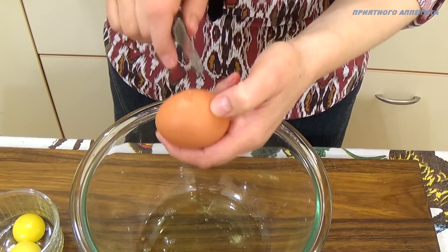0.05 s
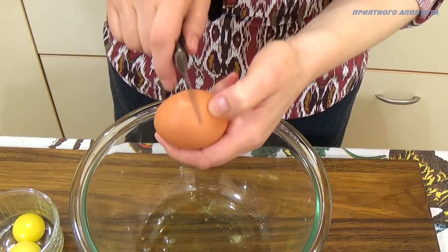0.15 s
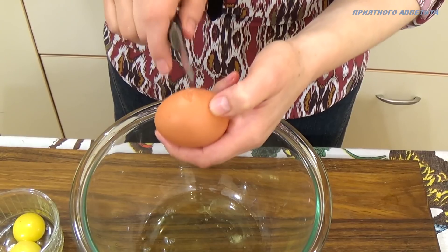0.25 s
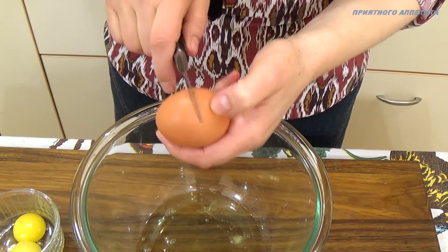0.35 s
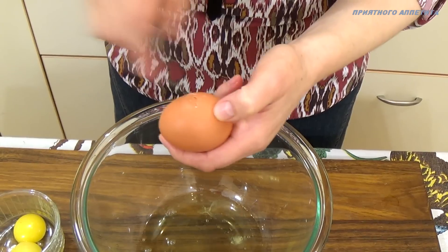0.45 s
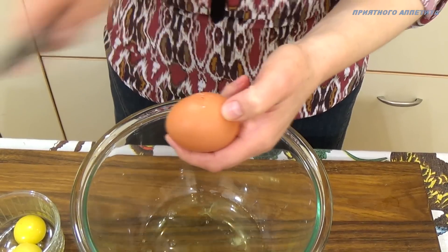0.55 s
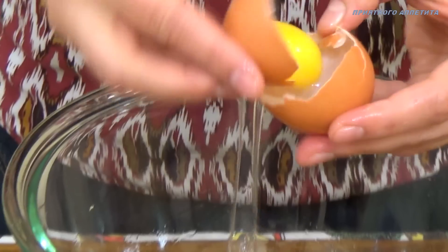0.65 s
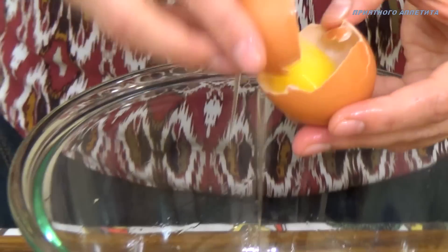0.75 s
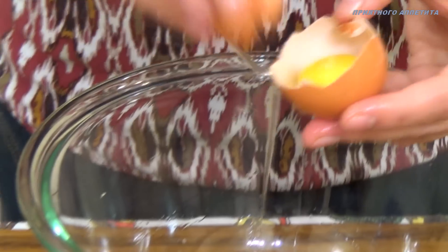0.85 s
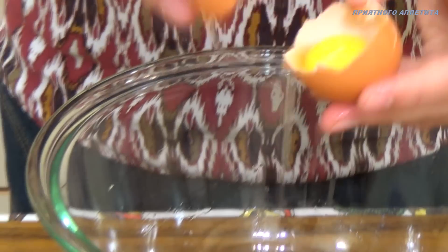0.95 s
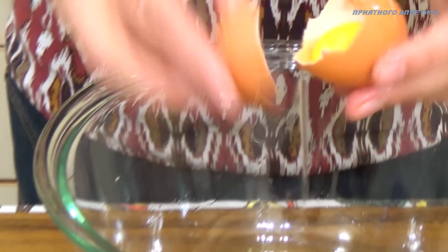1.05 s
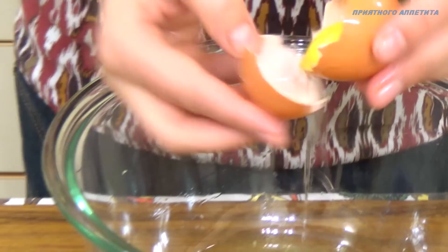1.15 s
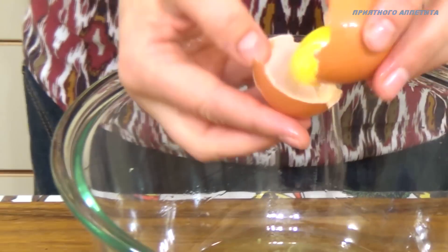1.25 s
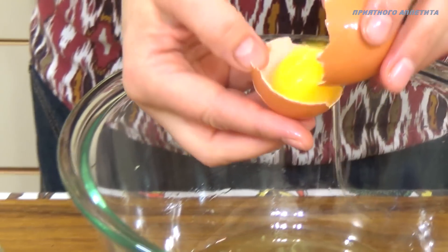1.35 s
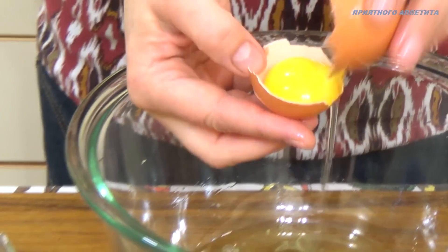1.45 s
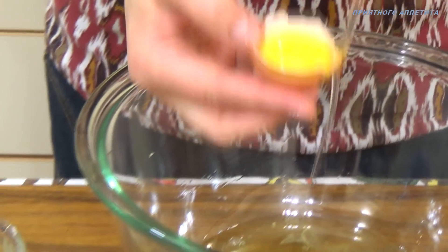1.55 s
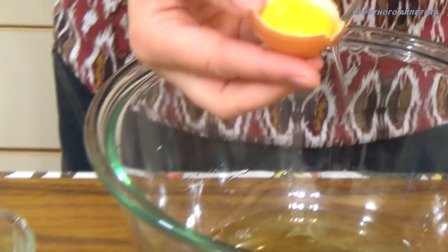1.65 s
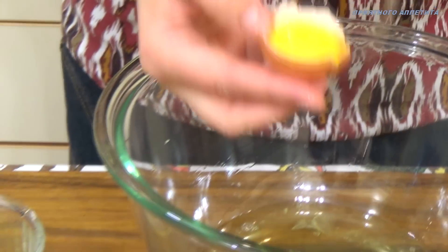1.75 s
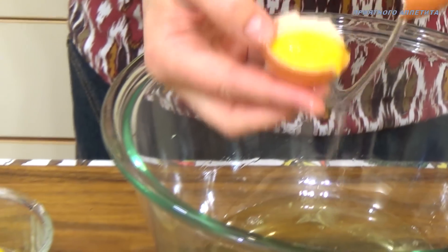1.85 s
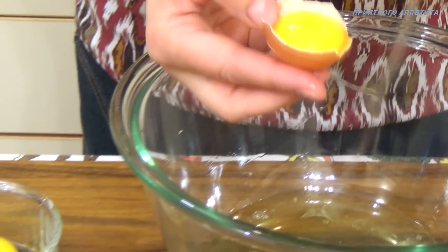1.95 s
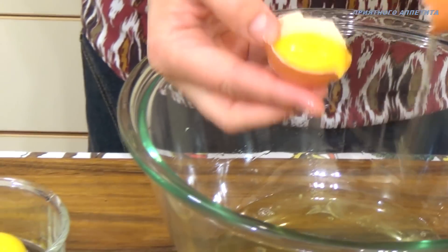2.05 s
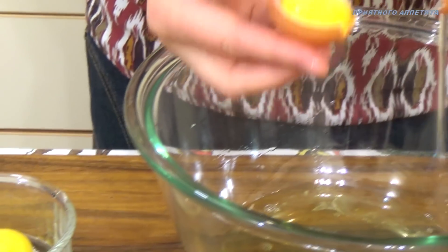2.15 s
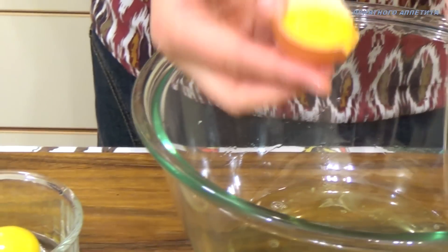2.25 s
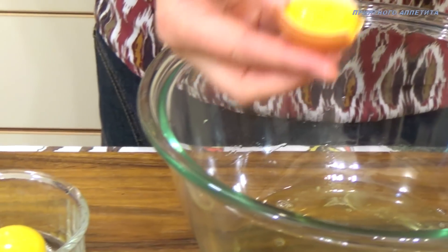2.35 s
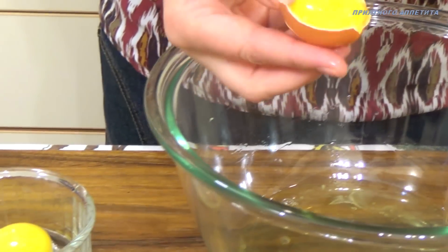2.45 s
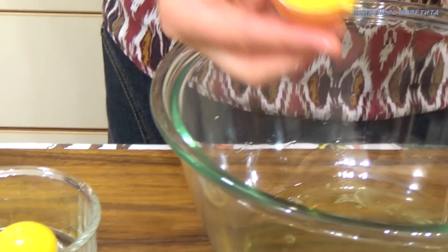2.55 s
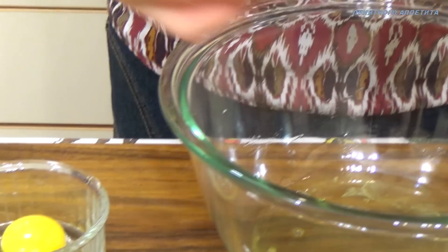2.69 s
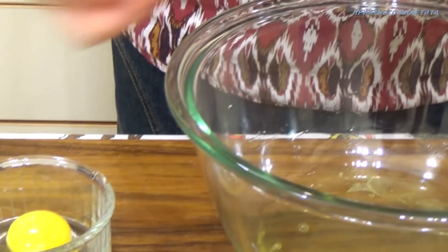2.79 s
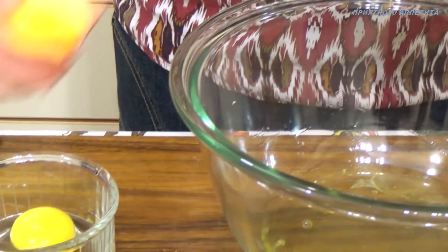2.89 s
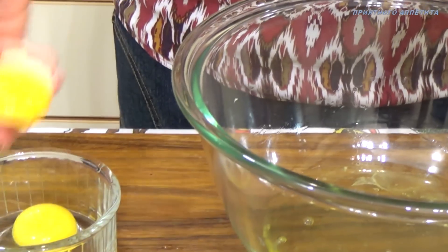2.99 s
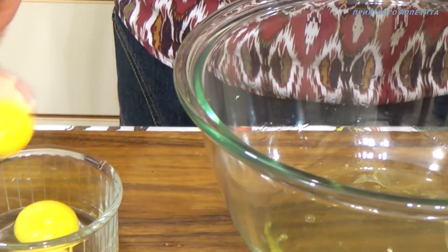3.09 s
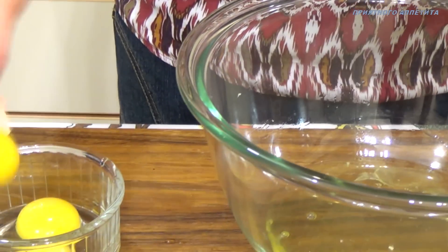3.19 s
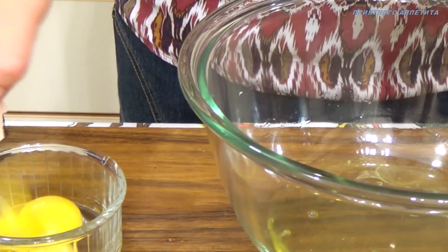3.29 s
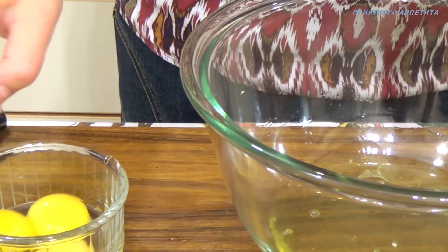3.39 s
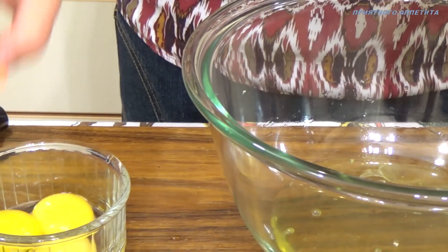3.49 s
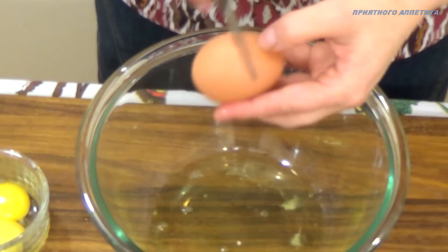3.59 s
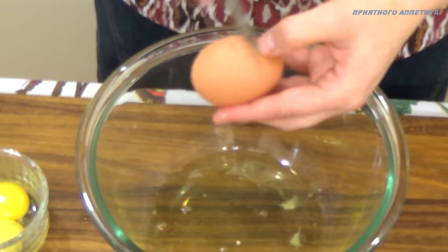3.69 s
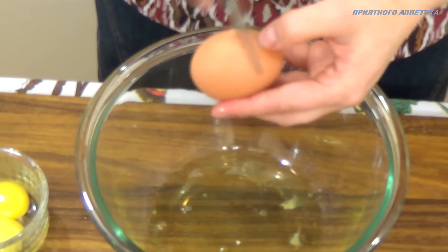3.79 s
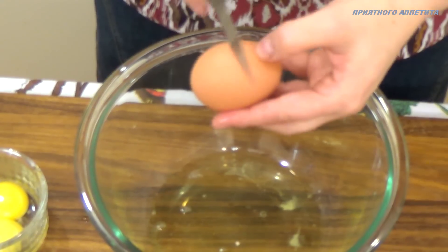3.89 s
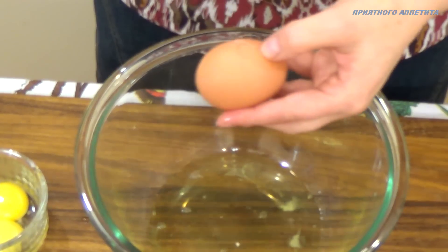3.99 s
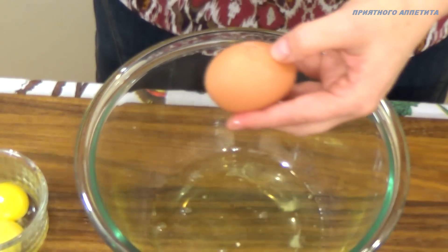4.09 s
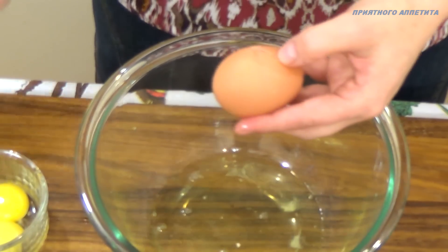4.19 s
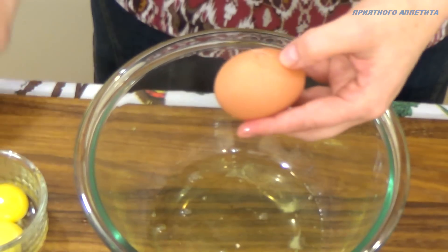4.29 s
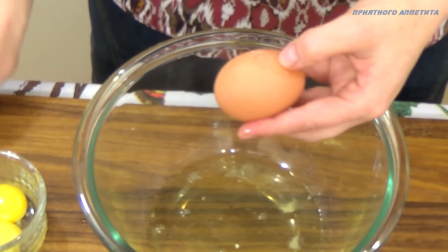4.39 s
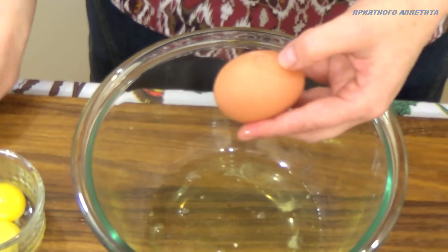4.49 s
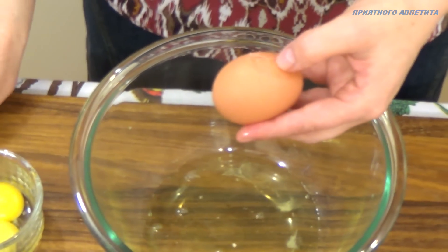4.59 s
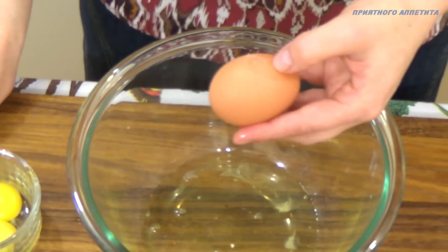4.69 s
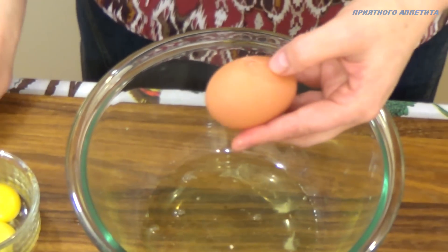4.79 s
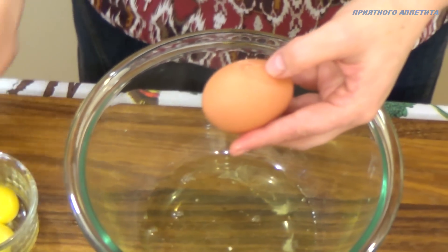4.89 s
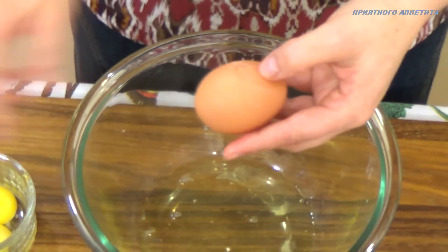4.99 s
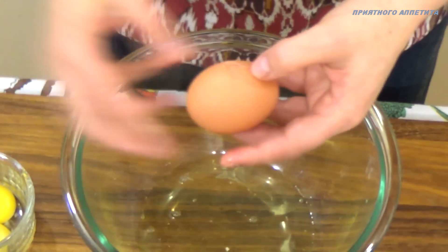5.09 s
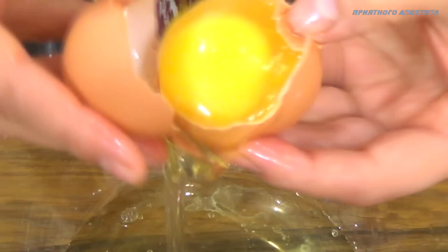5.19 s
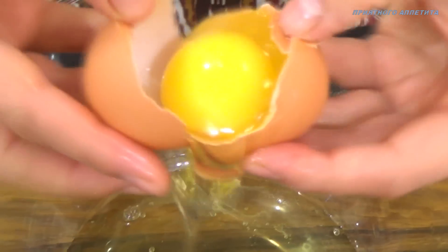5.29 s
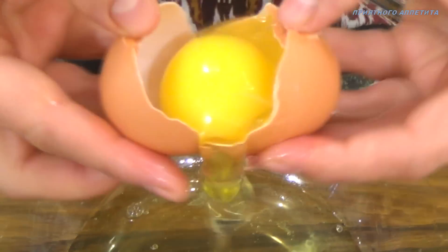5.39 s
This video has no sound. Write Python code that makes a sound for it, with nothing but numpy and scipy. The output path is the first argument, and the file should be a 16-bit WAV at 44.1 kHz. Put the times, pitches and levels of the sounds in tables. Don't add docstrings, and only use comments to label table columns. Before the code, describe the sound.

Loud, brittle knife taps on a raw egg open the scene, the first clipped by a cut. Shell ticks, faint skin brushing and tiny egg white drips follow quietly. Another egg gets three taps, then the blade bounces on the wooden counter and its handle knocks as it settles. A thin shell crackle closes. Close microphone pair, short bright kitchen reflections, constant hiss and appliance hum.

```python
import sys
import numpy as np
from scipy import signal
from scipy.fft import rfft, irfft
from scipy.io import wavfile

SR = 44100
rng = np.random.default_rng(int(sys.argv[2]) if len(sys.argv) > 2 else 0)


def to_wav(sig):
    pcm = np.clip(np.atleast_2d(sig), -1, 1) * 32767
    pcm = np.round(pcm).astype(np.int16)
    wavfile.write(sys.argv[1], SR, pcm.T)


def level_to_linear(level):
    exponent = np.asarray(level, float) / 20
    return 10 ** exponent


N = 240019


def evened(x):
    return x / np.sqrt(np.mean(x ** 2) + 1e-20)


def read(points, hz):
    f, value = np.transpose(points)
    return np.interp(np.log(hz + 1), np.log(f + 1), value)


def shaped(x, points):
    size = x.shape[-1]
    gain = level_to_linear(read(points, np.fft.rfftfreq(size, 1 / SR)))
    return irfft(rfft(x) * gain, size)


def causal(points, size=2048):
    level_db = np.maximum(read(points, np.fft.rfftfreq(size, 1 / SR)), -80)
    cepstrum = irfft(np.log(level_to_linear(level_db)), size)
    cepstrum[1:size // 2] *= 2
    cepstrum[size // 2 + 1:] = 0
    return irfft(np.exp(rfft(cepstrum)), size)


def resonate(x, hz, width):
    r = np.exp(-np.pi * width / SR)
    pole = r * np.exp(2j * np.pi * hz / SR)
    return 2 * signal.lfilter([1 - r], [1, -pole], x).real


def add(mix, start_s, sound):
    part = mix[..., round(start_s * SR):][..., :sound.shape[-1]]
    part += sound[..., :part.shape[-1]]


def place(tracks, start_s, level_db, room_db, pan_db, near, far):
    direct, lean, sent = tracks
    add(direct, start_s, level_to_linear(level_db) * near)
    add(lean, start_s, level_to_linear(level_db) * near * np.tanh(pan_db * np.log(10) / 40))
    add(sent, start_s, level_to_linear(level_db + room_db) * far)


# pitch_hz, level_db (per Hz)
HISS_COLOUR = [(41, -41.5), (70, -27), (125, 1), (240, -4.5), (698, -7.5), (2000, -13.5), (13700, -22),
               (15300, -25)]
# pitch_hz, side_minus_mid_db
HISS_WIDTH = [(60, -17), (130, -18.5), (290, -7.5), (640, -2), (1410, 0.5), (3100, -2.5), (6820, -8.5),
              (15000, -36)]
SHOT_HISS = [0.33, 1.1, -0.34, 0.68, 0.21]


def hiss():
    mid, side = rng.standard_normal((2, N))
    level_db = -57.5
    mid = level_to_linear(level_db) * evened(shaped(mid, [*HISS_COLOUR, (16300, -67), (16700, -90)]))
    side = shaped(level_to_linear(level_db) * evened(shaped(side, HISS_COLOUR)), HISS_WIDTH)
    change_s = np.transpose(SCENE_CHANGES)[0]
    shot = np.searchsorted(change_s, np.arange(N) / SR)
    return mid * level_to_linear(np.array(SHOT_HISS)[shot]) + np.array([side, -side])


# start_s, rise_s, hold_s, release_s, level_db
COUNTER_SHAKE = (4.47, .1, .62, .2, -50)
# centre_s, half_width_s, level_db
FLOOR_SWELLS = [
    (4.0, 0.46, -68),
    (5.44, 0.25, -58),
]


def rumble():
    house, floor = rng.standard_normal((2, N))
    t = np.arange(N) / SR
    start, rise, hold, release, shake_db = COUNTER_SHAKE
    corners = np.cumsum([0, rise, hold, release])
    shake = level_to_linear(shake_db) * np.interp(t - start, corners, [0, 1, 1, 0])
    swells = sum(level_to_linear(db) * np.clip(1 - abs(t - s) / half, 0, 1) for s, half, db in FLOOR_SWELLS)
    house = evened(resonate(resonate(house, 156, 140), 156, 140))
    floor = evened(resonate(resonate(floor, 49, 30), 49, 30))
    return (level_to_linear(-69) + shake) * house + (level_to_linear(-75) + swells) * floor


# pitch_hz, width_hz, level_db (rms)
DRONE_TONES = [(120, 3.1, -75), (178.5, 15, -69.5), (362, 44, -70.5)]


def hum():
    noise = rng.standard_normal(N)
    return sum(level_to_linear(db) * evened(resonate(noise, hz, width)) for hz, width, db in DRONE_TONES)


def whine():
    t = np.arange(N) / SR
    line_hz, field_hz, blank_s = 15625, 50, 0.01225
    fields = (t - blank_s) * field_hz
    away = abs(fields - np.round(fields))
    gate = np.interp(away, [.095, .135, .25], [.12, .75, 1])
    return level_to_linear(-57) * gate * np.cos(2 * np.pi * line_hz * t)


# pitch_hz, level_db
NEAR_BRIGHTNESS = [(300, -9.5), (2000, -0.6), (6000, 5), (12000, 8), (16000, 2.5)]


def blow(ms, ring_db, crack, ring):
    t = np.arange(2048) / SR
    u = t * 1000 / max(ms, .2)
    fractures = rng.standard_normal(2048) * np.sqrt(rng.exponential(1, 2048))
    burst = fractures * np.minimum(.35 + u / .6, 1) * np.exp(-u ** 4)
    colour = causal(crack)
    burst = signal.fftconvolve(shaped(burst, NEAR_BRIGHTNESS), colour)[:2048]
    burst /= np.linalg.norm(burst)
    modes = np.zeros(2048)
    for hz, width, db in ring:
        modes += level_to_linear(db) * width * np.exp(-np.pi * width * t) * np.sin(2 * np.pi * hz * t)
    modes *= 1 - np.exp(-(u / 0.71) ** 2)
    modes *= level_to_linear(ring_db) / np.linalg.norm(modes)
    near = burst + modes
    far = colour / np.linalg.norm(colour) + 0.34 * modes + 0.35 * burst
    scale = np.sqrt(ms * SR / 1000) / 4
    return scale * near, scale * far


# start_s, level_db (peak), crack_ms, ring_db (over the crack), room_db
EGG_TAPS = [
    (.0085, -6.5, 4.1, -4, -3),
    (0.1939, -2.5, 2.72, -6, -5.5),
    (0.4072, -5, 4.07, -5, -6.5),
    (3.3902, -10, 1.87, 0.5, -5),
    (3.6699, -5, 2.76, -0.5, -1),
    (3.8814, -5.5, 3.24, -1, -3.5),
]
# pitch_hz, level_db (per Hz)
EGG_CRACKS = [
    [(150, -20.5), (560, -11), (800, -1), (1300, -1), (1840, -18.5), (2450, -7), (3300, -12.5),
     (16000, -26.5)],
    [(120, -37), (763, -4.5), (1180, -4.5), (1320, -10.5), (1530, -4), (4120, -15.5), (9750, -12.5),
     (16000, -26)],
    [(120, -41), (300, -23), (800, -5), (960, -9), (2090, -6.5), (4120, -18), (7000, -15), (16000, -27.5)],
    [(150, -21), (579, -4), (1700, -17.5), (2800, -5), (4400, -20.5), (5500, -7.5), (6000, -17),
     (13500, -19)],
    [(120, -48), (900, 1.5), (1350, -14.5), (4600, -21), (5940, -11.5), (6880, -16), (11500, -23.5),
     (16000, -39)],
    [(120, -58), (763, -1.5), (1940, -23.5), (2330, -12.5), (2910, -24.5), (5940, -16.5), (9580, -16.5),
     (16000, -33.5)],
]
# pitch_hz, width_hz, level_db
EGG_RINGS = [
    [(900, 580, -15), (1250, 150, 1), (2250, 350, 10)],
    [(186, 81, -14), (788, 110, 6), (2360, 100, -1)],
    [(217, 85, -14.5), (723, 143, 2), (1140, 280, -6), (2300, 430, -11), (5760, 260, 5.5)],
    [(248, 130, -18), (644, 40, -2), (2510, 67, 1), (3160, 140, 0), (5250, 270, 0), (5700, 81, 11.5)],
    [(254, 63, -19.5), (788, 93, -1.5), (1774, 310, -8.5)],
    [(244, 180, -23), (796, 74, 2), (2340, 40, -12.5)],
]


def egg_taps():
    tracks = np.zeros((3, N))
    for (start_s, db, ms, ring_db, room_db), crack, ring in zip(EGG_TAPS, EGG_CRACKS, EGG_RINGS):
        near, far = blow(ms, ring_db, crack, ring)
        if start_s <= SCENE_CHANGES[0][0]:
            near = 0 * near
        place(tracks, start_s, db, room_db, 3.5, near, far)
    return tracks


# start_s, length_s, level_db (rms), centre_hz, width_hz
BRUSH_STROKES = [(0.882, 0.057, -59.5, 4300, 2500), (1.878, 0.07, -61.5, 4500, 3000),
                 (2.885, 0.087, -61, 2500, 2700), (5.255, .18, -66, 2000, 1500), (5.2, 0.24, -60, 490, 600),
                 (.7, 0.34, -63.5, 1100, 2000)]


def brushes():
    tracks = np.zeros((3, N))
    for start_s, length_s, db, hz, width in BRUSH_STROKES:
        noise = rng.standard_normal(min(int(length_s * SR), SR // 4))
        rub = evened(resonate(noise, hz, width)) * signal.windows.tukey(len(noise), .6)
        add(tracks[0], start_s, level_to_linear(db) * rub)
    return tracks


# start_s, level_db (peak), crack_ms, room_db, left_minus_right_db
SHELL_SNAPS = [(.9077, -40, 1.2, -14, 0), (1.298, -42.5, 5, -12, 5), (1.4381, -21.5, 0.54, -8, 4),
               (1.44, -30, 1.5, -6, 5), (1.4525, -16.5, 1.1, -13.5, -4), (5.316, -40, 1.1, -8, -1),
               (5.3642, -45, 1.4, -12, 0), (5.3823, -15.5, 0.63, -13, 3.5), (5.384, -28, 2.3, -14, 3),
               (5.3914, -33, 1.2, -14, 0)]
SHELL_KIND = [0, 0, 0, 0, 1, 0, 0, 2, 2, 2]
# pitch_hz, level_db (per Hz)
SHELL_CRACKS = [
    [(2000, -12), (4000, -6), (7000, 3), (10500, 8), (13500, -7), (16000, -25)],
    [(3500, -28), (4800, -7), (5500, 7.5), (6500, -4), (10000, -10), (13000, -12), (16000, -37)],
    [(1200, -43), (2150, -24), (4500, -7.5), (7000, -5.5), (8800, 4.5), (12000, -6.5), (16000, -16)],
]
# pitch_hz, width_hz, level_db
SHELL_RINGS = [
    [(10050, 280, 0)],
    [(5440, 160, 2), (8600, 450, -10)],
    [(2100, 57, -5.5), (3430, 200, -20), (8940, 900, -12)],
]
SHELL_RING_LEVELS = [-12, -10, -7]


def shell_snaps():
    tracks = np.zeros((3, N))
    for (start_s, db, ms, room_db, pan_db), kind in zip(SHELL_SNAPS, SHELL_KIND):
        near, far = blow(ms, SHELL_RING_LEVELS[kind], SHELL_CRACKS[kind], SHELL_RINGS[kind])
        place(tracks, start_s, db, room_db, pan_db, near, far)
    return tracks


# start_s, level_db (peak), pitch_hz (at start), length_ms,
# room_db
EGG_DRIPS = [(0.942, -35.5, 120, 1.8, -18), (1.279, -39, 2070, 0.81, -23), (1.706, -45.5, 1930, 3.9, -3),
             (1.865, -43, 2030, 3.4, -20), (1.869, -45.5, 1150, 4.2, -26), (1.899, -52, 1755, 7.2, 1.5),
             (1.913, -48, 900, 6.7, -3), (2.212, -50.5, 2120, 9.6, -14), (2.213, -49, 4580, 3.6, -22),
             (2.2838, -46.5, 1250, 9.1, -20), (2.444, -52.5, 2120, 5, -19), (4.209, -46, 1710, 1.9, -16),
             (4.352, -49.5, 566, 14, -12), (4.489, -52, 146, 32, 2), (5.33, -54, 2380, 4.8, -4)]


def drips():
    tracks = np.zeros((3, N))
    for start_s, db, hz, ms, room_db in EGG_DRIPS:
        u = np.linspace(0, 1, int(ms * SR / 1000) + 8)
        glide_hz = hz * 0.66 ** u
        tone = np.sin(2 * np.pi * np.cumsum(glide_hz) / SR)
        swell = np.sqrt(np.sin(np.pi * u ** 0.56)) ** 3
        roughness = 1 + 0.24 * rng.standard_normal(len(u))
        sound = tone * swell * roughness
        place(tracks, start_s, db, room_db, 0, sound, sound)
    return tracks


# start_s, level_db (peak), room_db
KNIFE_BOUNCES = [
    (4.5580, -23.5, 10.5),
    (4.5760, -24, 6.5),
    (4.5905, -26, 5),
    (4.5985, -29, -0.5),
    (4.605, -44, 2),
    (4.619, -38, 10.5),
    (4.645, -38.5, -8),
]
# pitch_hz, level_db (per Hz)
KNIFE_COLOUR = [(150, -17), (480, -17), (630, 6.5), (950, -47), (2300, -16), (5400, -29), (5800, -35),
                (14000, -56)]
# pitch_hz, width_hz, level_db
KNIFE_MODES = [(555, 29, -1), (687, 57, 4), (1250, 140, -5), (1850, 59, -8), (2346, 170, -11.5),
               (2980, 250, -10), (4115, 72, -14), (5130, 90, -17)]


def knife_bounces():
    tracks = np.zeros((3, N))
    for start_s, db, room_db in KNIFE_BOUNCES:
        near, far = blow(2.6, 13, KNIFE_COLOUR, KNIFE_MODES)
        place(tracks, start_s, db, room_db, 3, near, far)
    return tracks


# start_s, level_db (peak), contact_ms, ring_db, room_db
WOOD_KNOCKS = [(4.749, -24, 11.3, 1.5, 3.5), (4.76, -28, 5.6, -23, 7.5), (4.878, -25, 6.8, 5.5, 6),
               (4.904, -26.5, 6.2, 0, 8), (4.942, -25, 5.5, 4, 0), (4.966, -20.5, 8.7, -2.5, -10.5),
               (4.974, -22.5, 8.4, -1.5, 9), (4.989, -21, 3.8, 4, 1.5), (5.011, -26, 3.5, -9, 4.5),
               (5.024, -46, 6.4, 5, 18)]
WOOD_KIND = [0, 0, 1, 1, 1, 2, 2, 2, 2, 2]
# pitch_hz, level_db (per Hz)
WOOD_COLOURS = [
    [(47, -49), (134, -15), (218, -4.5), (319, 0), (684, 1.5), (1020, -14.5), (5000, -56), (11000, -120)],
    [(47, -50), (125, -8), (269, -7.5), (684, 3.5), (1300, -13.5), (1740, -33), (5000, -50), (11000, -120)],
    [(47, -33), (250, -3.5), (478, -6.5), (540, 4.5), (1000, -6.5), (2600, -28.5), (3200, -42),
     (11000, -110)],
]
# pitch_hz, width_hz, level_db
WOOD_MODES = [
    [(137, 7.7, 0), (312, 35, 2), (526, 26, -12), (927, 23, -18), (1034, 23, -11)],
    [(275.5, 38, 5), (547, 14, -2), (705, 29, -3), (945, 41, -16), (1253, 37, -15)],
    [(354, 10, 5.5), (560, 39, -13), (751.5, 9, 4.5), (960, 57, 4), (1470, 35, -10), (1950, 110, -6.5)],
]


def wood_knocks():
    tracks = np.zeros((3, N))
    for (start_s, db, ms, ring_db, room_db), kind in zip(WOOD_KNOCKS, WOOD_KIND):
        near, far = blow(ms, ring_db, WOOD_COLOURS[kind], WOOD_MODES[kind])
        place(tracks, start_s, db, room_db, 1.5, near, far)
    return tracks


# pitch_hz, fade_s (time to fall 60 dB)
ROOM_FADE = [(250, 0.56), (660, 0.34), (1740, 0.41), (4590, 0.4), (12100, 0.26)]
# pitch_hz, side_minus_mid_db
ROOM_WIDTH = [(60, -50), (130, -19), (290, -16), (640, -10.5), (1410, -5.5), (3100, -5.5), (6820, -6),
              (15000, -35)]
# pitch_hz, left_minus_right_db
ROOM_TILT = [(150, -0.5), (500, 1.5), (1500, 2.5), (4000, 0.3), (10000, -1.5)]
# delay_s, level_db (over the tail)
ROOM_ECHOES = [
    (.0062, -13.5),
    (0.0107, -15.5),
    (0.0135, -41),
]


def kitchen(x):
    size = SR // 2 + SR // 4
    noise = rng.standard_normal((2, size))
    hz, t, z = signal.stft(noise, SR, nperseg=256)
    fade_s = np.maximum(read(ROOM_FADE, hz), .05)[:, None]
    tail = signal.istft(z * level_to_linear(-60 * t / fade_s), SR, nperseg=256)[1][:, :size]
    tail *= np.clip((np.arange(size) / SR - .003) / 0.0038, 0, 1)
    tail /= np.linalg.norm(tail[0])
    for delay_s, db in ROOM_ECHOES:
        tail[0, round(delay_s * SR)] += level_to_linear(db)
    mid, side = tail[0], shaped(tail[1], ROOM_WIDTH)
    half_tilt = np.array(ROOM_TILT) * [1, .5]
    left = shaped(mid, half_tilt) + side
    right = shaped(mid, half_tilt * [1, -1]) - side
    return signal.fftconvolve(x[None], np.array([left, right]), axes=1)[:, :N]


# pitch_hz, level_db
PAIR_SEPARATION = [(2500, -2), (7000, -3), (13000, -8)]


def microphones(tracks):
    direct, lean, sent = tracks
    lean = shaped(lean, PAIR_SEPARATION)
    return direct + np.array([lean, -lean]) + kitchen(sent)


def scene():
    tracks = egg_taps() + brushes() + shell_snaps() + drips() + knife_bounces() + wood_knocks()
    return hiss() + rumble() + hum() + whine() + microphones(tracks)


# centre_s, half_width_s, depth_db
SCENE_CHANGES = [
    (0.0142, 0.0069, -30),
    (.693, 0.0063, -18),
    (3.652, 0.0055, -17),
    (5.253, .006, -25),
]


def scene_dips(dry):
    t = np.arange(N) / SR
    dips = [np.clip(abs(t - s) / half, level_to_linear(db), 1) for s, half, db in SCENE_CHANGES]
    return dry * np.prod(dips, axis=0)


def top_cut(x):
    return signal.sosfilt(signal.butter(12, 17020, fs=SR, output="sos"), x)


def record(dry):
    edge = signal.firwin(255, 16000, window=("kaiser", 8), fs=SR)
    mix = signal.oaconvolve(scene_dips(dry), edge[None], "same")
    return top_cut(mix)


dry = scene()
out = record(dry)
to_wav(out)
```